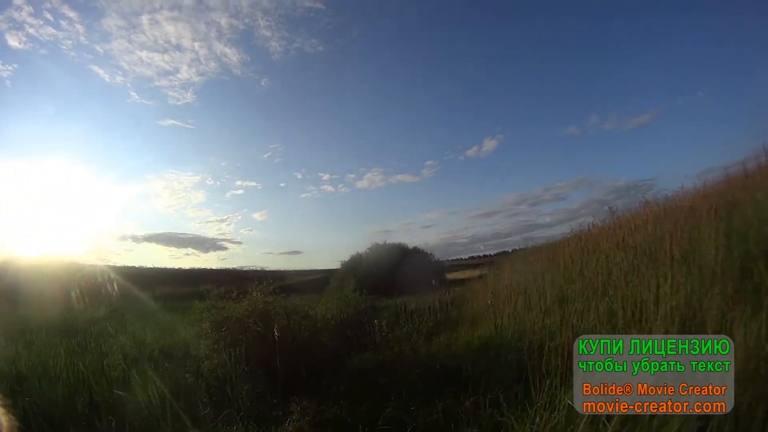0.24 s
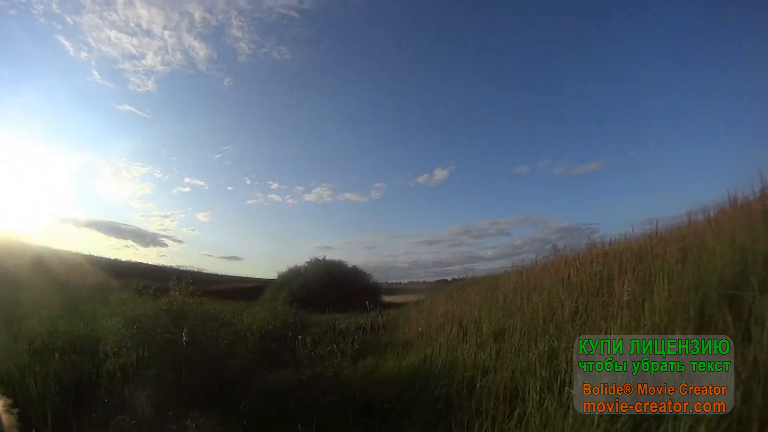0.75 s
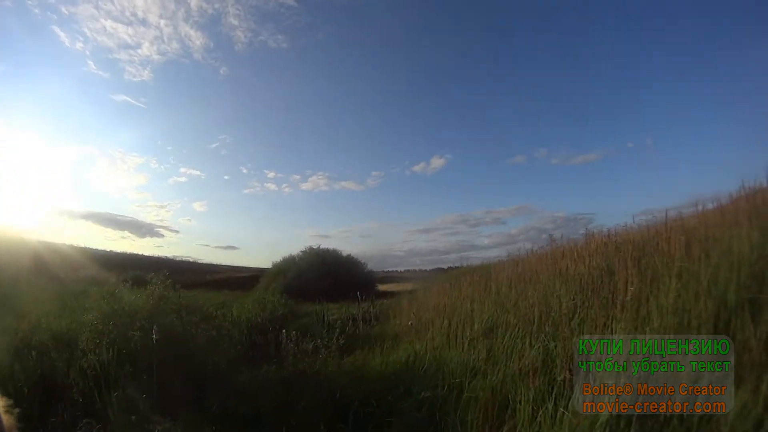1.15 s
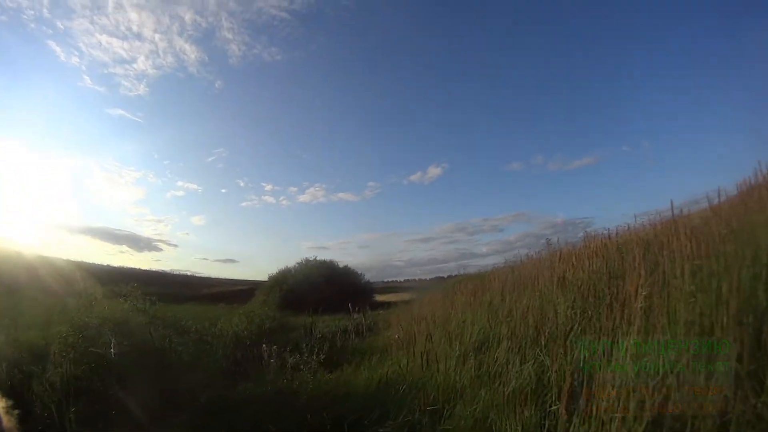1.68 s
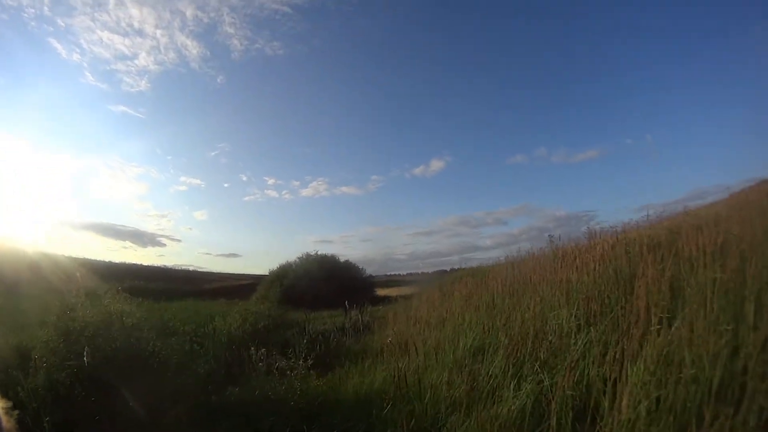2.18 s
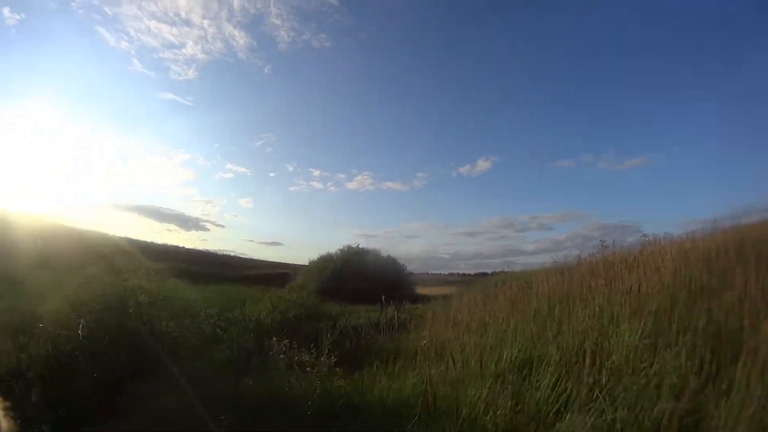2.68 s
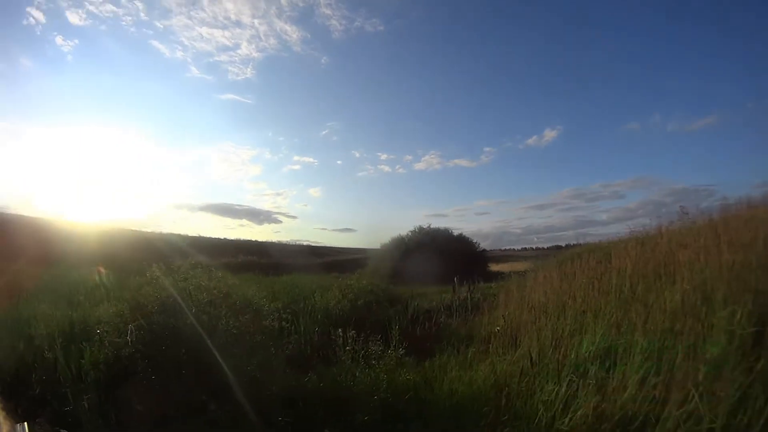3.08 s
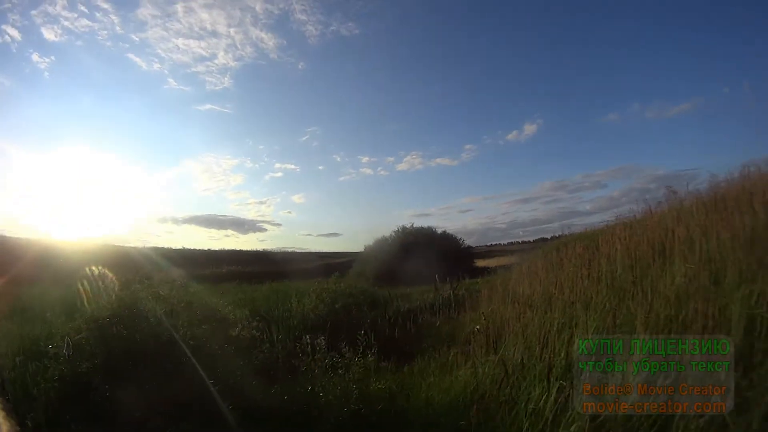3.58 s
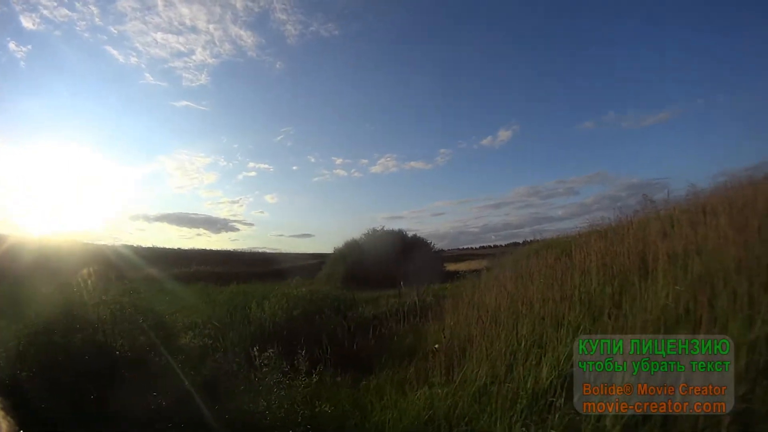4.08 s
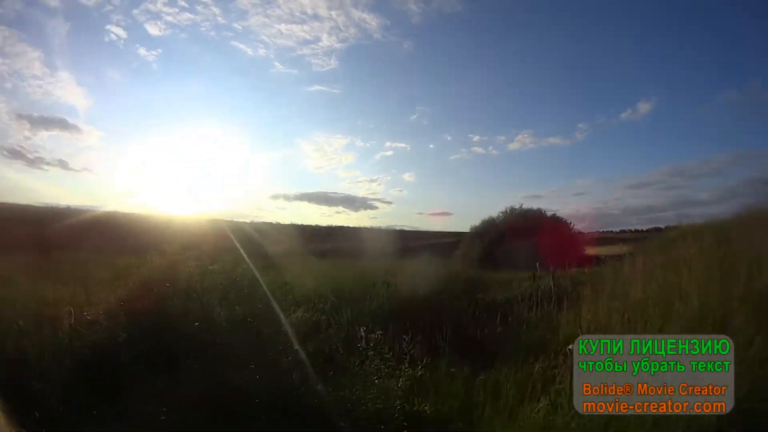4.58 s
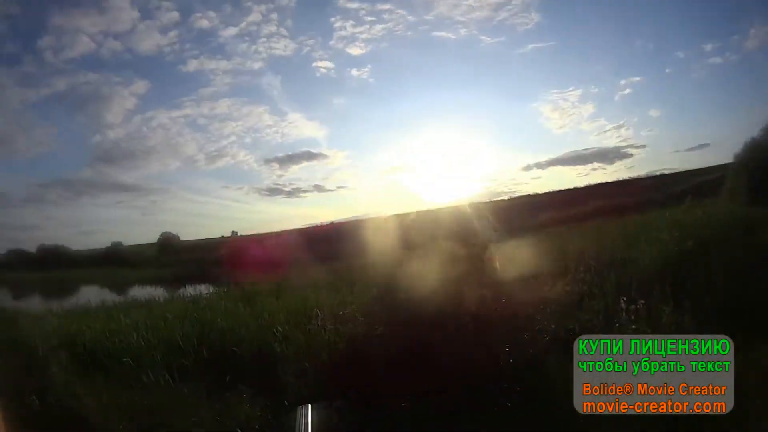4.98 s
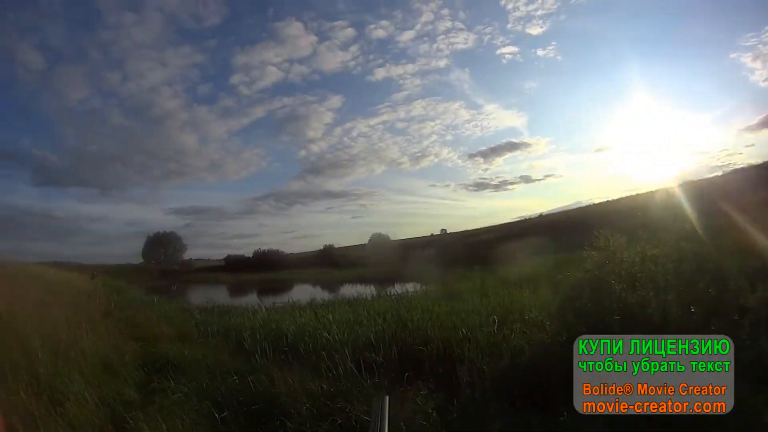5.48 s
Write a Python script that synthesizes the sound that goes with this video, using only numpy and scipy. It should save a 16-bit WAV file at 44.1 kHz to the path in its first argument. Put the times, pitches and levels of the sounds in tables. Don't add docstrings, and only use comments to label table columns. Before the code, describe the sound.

Walking through tall dry grass, raspy swishes with each stride, tiny stem snaps, faint steady insect hiss, and one hard knock on the camera case late on.

```python
import sys
import numpy as np
from scipy import signal
from scipy.fft import rfft, irfft, next_fast_len
from scipy.io import wavfile
from scipy.ndimage import uniform_filter1d, map_coordinates

SR = 44100
rng = np.random.default_rng(int(sys.argv[2]) if len(sys.argv) > 2 else 0)


def master(y):
    cut = np.clip(np.atleast_2d(y).T, -1, 1)
    pcm = np.round(cut * 32767)
    wavfile.write(sys.argv[1], SR, pcm.astype(np.int16))


def voltage_ratio(level):
    return 10 ** (np.asarray(level, float) / 20)


N = 253373

# (frequency [Hz], density [dB per Hz])
MEADOW_SUM = [(450, -31.5), (760, -14), (1120, 0.5), (1460, -3), (1930, -7), (2250, -0.5), (2440, -10.5),
              (2850, 4), (3150, -3), (3900, -2), (4220, -5.5), (5340, -2), (6380, -9), (7810, -4),
              (11000, -12.5), (14400, -65), (22000, -120)]
MEADOW_DIFFERENCE = [(450, -57), (760, -9), (1010, -0.5), (1740, -5), (2250, -7), (3530, -6.5), (3900, -30),
                     (4220, -8), (11000, -16.5), (14400, -51), (22000, -120)]
# (frequency [Hz], density [dB per Hz])
BREEZE_SUM = [(18, -33), (30, -17.5), (135, -8.5), (237, -11), (317, -9.5), (810, -13.5), (1050, -30),
              (1780, -120)]
BREEZE_DIFFERENCE = [(18, -37), (30, -12), (101, -28), (141, -13), (746, -6.5), (810, -7.5), (1050, -50),
                     (1780, -120)]
# (frequency [Hz], share [0-1], phase [rad])
PORT_LINK = [(300, 0, -1), (1210, .8, -2.5), (1700, 0.44, -2), (3020, 1, -1.34), (4700, 0.3, -3.5),
             (5100, .65, -1), (5700, 0.4, -6), (6300, 1, -16), (7540, 0.2, -7), (8850, 0.4, -1),
             (10900, 0.3, -1.5)]
# (frequency [Hz], density [dB per Hz])
CAVITY = [(300, -22.5), (950, -12.0), (1120, -8.5), (1230, -3), (1330, -5), (1450, -13.0),
          (1680, -8.0), (1950, -16.0), (2230, -11.5), (2600, -25), (4000, -76)]
# (time [s], level [dB])
HAND_JOLTS = [(.08, -66), (.54, -62), (.86, -50.5), (.98, -75), (1.26, -76), (1.63, -57.5), (1.96, -60),
              (2.37, -71), (2.69, -52.5), (.62, -64), (3.3, -71), (3.46, -64), (4.46, -49), (4.5, -51.5),
              (4.86, -68), (5.2, -55), (5.28, -71), (5.58, -64)]
# (time [s], peak [dB], pitch [Hz], t60 [s])
STRAP_TAPS = [(1.72, -41, 950, 0.04), (1.74, -44, 950, 0.04), (2.635, -40, 1000, 0.04),
              (2.724, -42, 950, 0.04), (3.279, -49, 950, 0.04), (3.75, -46, 950, 0.04),
              (4.312, -43, 950, 0.04), (4.553, -43, 600, 0.04), (5.053, -43, 1000, 0.04),
              (5.12, -43, 800, 0.04), (5.251, -45, 950, 0.04), (5.33, -46, 950, 0.04),
              (5.553, -47, 950, 0.04)]
# (time [s], peak [dB], hardness [dB per octave], twist [dB])
BUCKLE_BLOWS = [
    (4.4455, -20, -7, -32),
    (4.4550, .5, 0, -9.5),
    (4.4605, -22, 4, -21),
    (4.4715, -22, 3, -31),
    (4.4950, -25, 2, -28),
]
# (frequency [Hz], t60 [s], level [dB], first swing [+1 out, -1 in])
CASE_MODES = [(25, .3, -33, 1), (140, .05, -34, -1), (247, .024, -13, -1), (329, .031, -16, 1),
              (583, .021, -17, 1), (670, .065, -29, 1), (946, .055, -26, 1), (1254, .015, -19, -1),
              (1650, .01, -21, 1), (2180, .009, -21, -1)]
# (frequency [Hz], density [dB per Hz])
GRASS_SUM = [(1120, -52), (1900, -20.5), (2340, -12), (2580, -3.5), (2840, 2), (4010, -6), (5160, 1),
             (5500, -2), (5850, -8), (6550, -4.5), (7220, -7.5), (7840, -3), (8320, -4), (10200, -10.5),
             (10700, -17.5), (11300, -20), (14700, -50), (22000, -120)]
GRASS_DIFFERENCE = [(1120, -35), (1900, -15), (2290, -16), (3060, -1), (4190, -11.5), (5650, -11),
                    (6360, -9), (6860, -14), (7440, -7), (8570, -12), (10400, -18.5), (11300, -26),
                    (14700, -60), (22000, -120)]
# (enters [s], fullest [s], leaves [s], fullest level [dB], weaker on entry by [dB])
LEG_SWINGS = [
    (0.445, 0.626, 0.73, -38, 2.5),
    (1.343, 1.557, 1.786, -43, 7),
    (2.286, 2.583, 2.605, -42.5, 7),
    (3.177, 3.522, 3.51, -42.5, 9),
    (4.16, 4.403, 4.525, -42.5, 2),
]
# (time [s], level [dB], swell [dB per s], fade [dB per s], coarseness [dB])
STALK_SWAYS = [(0, -47.5, 100, 181, 1), (.23, -49, 26, 71, -7.5), (.335, -51, 156, 156, -17),
               (.41, -48, 46, 100, -6.5), (.776, -37, 205, 112, 0), (.89, -44, 71, 72, 4.5),
               (1.12, -55.5, 48, 85, 4.5), (1.525, -40.5, 145, 94, 0.5), (1.92, -54, 32, 105, -1),
               (2.725, -49, 81, 142, 2), (2.855, -53, 68, 56, 10), (3.15, -57.5, 43, 95, 2),
               (3.55, -46, 92, 60, 2.5), (3.69, -53.5, 60, 85, 5.5), (3.89, -54.5, 112, 100, -1),
               (3.975, -57.5, 80, 250, -11), (4.13, -49, 194.5, 96, 2.5), (4.4, -50, 156, 148, 2.5),
               (4.6, -60, 200, 100, 9), (4.76, -53, 31, 28, -1.5), (4.96, -59.5, 83, 60, 21),
               (5.1, -37.5, 103, 174, -1.5), (5.18, -49.5, 107, 49, -2.5), (5.322, -49, 708, 52, 0),
               (5.65, -59, 30, 124, -1)]
# (from [s], stalks [dB], blade tips [dB], low rustle [dB])
GRASS_PATCHES = [(0, 1, -6, 4.5), (.43, -5, -2.5, 2), (1.29, -4, -0.5, 0), (1.62, -1.5, -3, 3),
                 (2.21, -4, -1.5, -2), (3.08, -3, 1.5, -7), (3.34, -4, 0.5, -2.5), (3.58, -6.5, -3, 0.5),
                 (4.04, -5, -1.5, -0.5), (4.37, -1, -1, 3), (4.58, -4, -2.5, -10), (4.9, -3.5, -4.5, 0.5),
                 (5.2, -3.5, -5.5, -7)]
# (time [s], peak [dB], treble [dB])
STEM_SNAPS = [(0.0343, -33, -19), (0.4284, -26, -15), (0.8839, -24, -19), (1.3438, -35, -14),
              (2.7252, -28, -17), (3.495, -22, -13), (3.6142, -28, -7), (3.6616, -27, -17),
              (3.8836, -33, -18), (4.999, -32, -12), (5.3258, -26, -24)]


def unit(x):
    return x / np.sqrt(np.mean(x ** 2) + 1e-20)


def along(points, hz, column=1):
    rows = np.transpose(points)
    return np.interp(np.log(hz + 1), np.log(rows[0] + 1), rows[column])


def wobble(rate):
    knots = rng.standard_normal(int(N * rate / SR) + 4)
    return map_coordinates(knots, [np.arange(N) * rate / SR])


def tent(s, db, swell_db, fade_db):
    since = np.arange(N) / SR - s
    return voltage_ratio(db - np.where(since < 0, -swell_db, fade_db) * since)


def filtered(x, response):
    m = next_fast_len(N + 8192)
    return irfft(rfft(x, m) * response(np.fft.rfftfreq(m, 1 / SR)), m)[..., :N]


def band(hz, centre_hz, octaves):
    return np.exp(-.5 * (np.log2((hz + 1) / centre_hz) / octaves) ** 2)


def causal(points):
    grid = np.fft.rfftfreq(2048, 1 / SR)
    cepstrum = irfft(np.log(np.maximum(voltage_ratio(along(points, grid)), 1e-6)))
    folded = rfft(cepstrum * np.r_[1, np.full(1023, 2), 1, np.zeros(1023)])
    return lambda hz: voltage_ratio(along(points, hz)) * np.exp(1j * np.interp(hz, grid, folded.imag))


def ports(pair, sum_points, difference_points, side_db, link):
    m = next_fast_len(N + 8192)
    hz = np.fft.rfftfreq(m, 1 / SR)
    near, other = rfft(pair, m)
    share = np.clip(link * along(PORT_LINK, hz), 0, 1)
    follows = share * np.exp(1j * along(PORT_LINK, hz, column=2)) * near
    both = follows + np.sqrt(1 - share ** 2) * other
    case = causal(sum_points)(hz)
    mid = case * near
    side = both * case / abs(case) * voltage_ratio(side_db + along(difference_points, hz))
    return irfft([mid + side, mid - side], m)[:, :N]


def patchy(patchy_db):
    z = signal.stft(rng.standard_normal(N), nperseg=256)[2]
    field = uniform_filter1d(rng.standard_normal(z.shape), size=5, axis=0)
    field = uniform_filter1d(field, size=12, axis=1)
    return unit(signal.istft(z * voltage_ratio(patchy_db * unit(field)), nperseg=256)[1][:N])


def meadow():
    insects = [patchy(patchy_db=1.35), patchy(patchy_db=0.4)]
    hiss = ports(insects, MEADOW_SUM, MEADOW_DIFFERENCE, side_db=3.0, link=0.57)
    air = rng.standard_normal((2, N))
    breeze = ports(air, BREEZE_SUM, BREEZE_DIFFERENCE, side_db=0.5, link=0.81)
    return voltage_ratio(-52.3) * unit(hiss) + voltage_ratio(-60) * unit(breeze)


def low_rustle(level_db, patch_db):
    rustle_db, follows, lingers_s = -54, 0.61, 0.029
    stirred = voltage_ratio(rustle_db + patch_db + follows * (level_db - level_db.max()))
    stirred = filtered(stirred, lambda hz: 1 / (1 + 2j * np.pi * hz * lingers_s))
    pair = np.array([patchy(patchy_db=1.5), patchy(patchy_db=8.5)])
    rustle = unit(ports(pair, CAVITY, CAVITY, side_db=-1.0, link=1.05))
    return (stirred + voltage_ratio(-65.5)) * rustle


def footfalls():
    hand_db, rise_db_per_s, fall_db_per_s = -74.5, 260, 159
    jolts = voltage_ratio(hand_db) + sum(tent(s, db, rise_db_per_s, fall_db_per_s) for s, db in HAND_JOLTS)
    noise = rng.standard_normal((2, N))
    shake = filtered(noise, lambda hz: band(hz, centre_hz=37.5, octaves=0.73))
    thump = unit(shake[0]) + voltage_ratio(-12.5) * unit(shake[1]) * [[1], [-1]]
    return jolts * thump


def strap_taps():
    t = np.arange(1500) / SR
    hz = np.fft.rfftfreq(len(t), 1 / SR)
    out = np.zeros((2, N))
    for s, db, pitch_hz, t60 in STRAP_TAPS:
        noise = rfft(rng.standard_normal((2, len(t))))
        puff = unit(irfft(noise * band(hz, pitch_hz, octaves=.9), len(t)))
        envelope = voltage_ratio(db - 3 - 60 * t / t60) * (1 - np.exp(-t / .001))
        out[:, round(s * SR):][:, :len(t)] += envelope * puff
    return out


def buckle_knock():
    t = np.arange(SR // 4) / SR
    mid, side = np.zeros((2, N))
    contact = np.hanning(16) / np.hanning(16).sum()
    twist = np.sin(2 * np.pi * 900 * (t - .0014)) * np.exp(-((t - .0015) / .0007) ** 2)
    for s, db, hard_db, twist_db in BUCKLE_BLOWS:
        ring = np.zeros(len(t))
        for hz, t60, mode_db, way in CASE_MODES:
            tilt_db = hard_db * np.log2(max(hz, 200) / 500)
            ring += voltage_ratio(mode_db + tilt_db - 60 * t / t60) * way * np.sin(2 * np.pi * hz * t)
        start = round(s * SR)
        mid[start:][:len(t)] += voltage_ratio(db) * np.convolve(ring, contact)[:len(t)]
        side[start - 27:][:len(t)] += voltage_ratio(twist_db) * twist

    since = np.arange(N) / SR - 4.4400
    swell = np.exp(-np.abs(since) / np.where(since < 0, .0022, .003))
    noise = rng.standard_normal((2, N))
    scrape = swell * unit(filtered(noise, lambda hz: band(hz, centre_hz=1290, octaves=0.94)))
    rattle = (since > .004) * np.exp(-np.abs(since - .018) / .009)
    noise = rng.standard_normal(N)
    loose = rattle * unit(filtered(noise, lambda hz: band(hz, centre_hz=400, octaves=1.1)))
    side += voltage_ratio(-27) * scrape[1] + voltage_ratio(-28) * loose - .06 * mid
    mid += voltage_ratio(-25.5) * scrape[0] + voltage_ratio(-37) * np.roll(loose, 90)
    return np.array([mid + side, mid - side])


def leg_swing(t, enter, full, leave, db, weak_db):
    enter_db_per_s, sag_db_per_s, leave_db_per_s = 398, 20, 283
    sag_db = sag_db_per_s * (leave - full)
    below_db = np.array([weak_db + enter_db_per_s, weak_db, 0, sag_db, sag_db + leave_db_per_s])
    return voltage_ratio(np.interp(t, [enter - 1, enter, full, leave, leave + 1], db - below_db))


def drag():
    t = np.arange(N) / SR
    legs = [leg_swing(t, *row) for row in LEG_SWINGS]
    sways = np.array([tent(*row[:4]) for row in STALK_SWAYS]) ** 2
    power = np.sum(np.square(legs), 0) + sways.sum(0) + 1e-9
    coarse_db = np.transpose(STALK_SWAYS)[4] @ sways / power
    start, *colour = np.transpose(GRASS_PATCHES)
    patch = np.searchsorted(start, t, "right").clip(1) - 1
    stalk_db, tip_db, rustle_db = np.array(colour)[:, patch]
    level_db = 10 * np.log10(power)
    return level_db, stalk_db + coarse_db, tip_db - 0.57 * coarse_db, rustle_db + 0.81 * coarse_db


def scratch(clumps, grain_share):
    clicks = rng.standard_normal(N) * voltage_ratio(4.0 * rng.standard_normal(N))
    return unit(clumps * (grain_share * unit(clicks) + patchy(patchy_db=-0.5)))


def stem_snaps():
    out = np.zeros((2, N))
    t = np.arange(300) / SR
    for s, db, treble_db in STEM_SNAPS:
        crack = .5 * rng.standard_normal((2, len(t))) * voltage_ratio(-60 * t / 0.0067)
        crack[0, 0] = 1.8
        soft = uniform_filter1d(crack, size=4, origin=-2)
        crack = soft + voltage_ratio(treble_db + 12) * (crack - soft)
        out[:, round((s + .001) * SR):][:, :len(t)] += crack * voltage_ratio(db - 3)
    return out


def grass(level_db, stalk_db, tip_db):
    clumps = voltage_ratio(.6 * wobble(14) + .4 * wobble(60) + wobble(330))
    pair = np.array([scratch(clumps, grain_share=0.8), scratch(clumps, grain_share=.6)])
    pair = voltage_ratio(level_db) * pair
    stalks = filtered(pair, lambda hz: 1 / (1 + (hz / 3800) ** 6))
    tips = filtered(pair, lambda hz: 1 / (1 + (6900 / (hz + 1)) ** 8))
    between = pair - stalks - tips
    pair = voltage_ratio(stalk_db + 2.13) * stalks + voltage_ratio(tip_db + 2.5) * tips + between + stem_snaps()
    stride_s, rightmost_s, swing_db, lean_db = 0.895, 0.26, 1, -0.8
    stride = np.cos(2 * np.pi * (np.arange(N) / SR - rightmost_s) / stride_s)
    balance_db = (lean_db + swing_db * stride) / 2
    heard = ports(pair, GRASS_SUM, GRASS_DIFFERENCE, side_db=-3.0, link=0.99)
    return voltage_ratio(12 + balance_db * [[1], [-1]]) * heard


def scene():
    level_db, stalk_db, tip_db, rustle_db = drag()
    far = meadow()
    handling = low_rustle(level_db, rustle_db) + footfalls() + strap_taps() + buckle_knock()
    return far + handling + grass(level_db, stalk_db, tip_db)


def band_limit(x):
    return signal.sosfilt(signal.butter(12, 11450, fs=SR, output="sos"), x)


def record(dry):
    kept = filtered(dry, lambda hz: np.clip((11050 - hz) / 40, .003, 1))
    return band_limit(kept)


dry = scene()
out = record(dry)
master(out)
```